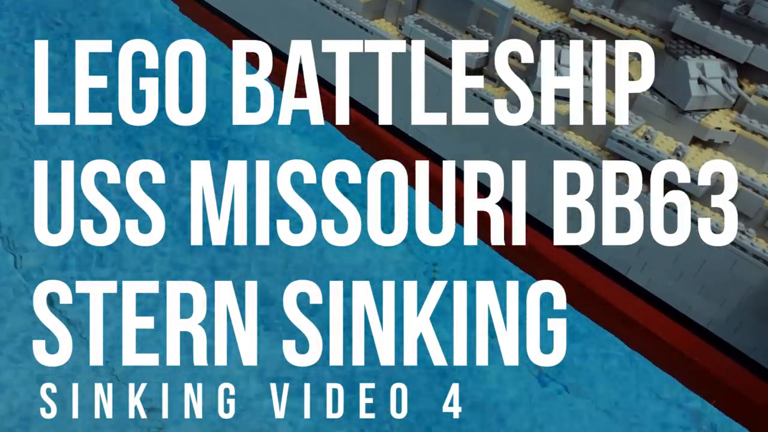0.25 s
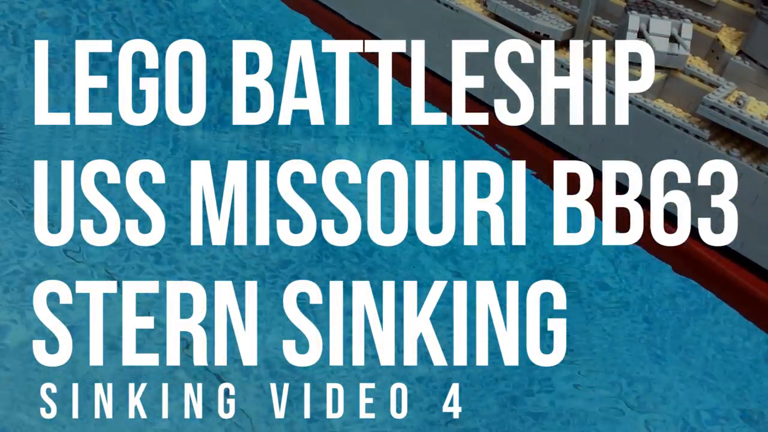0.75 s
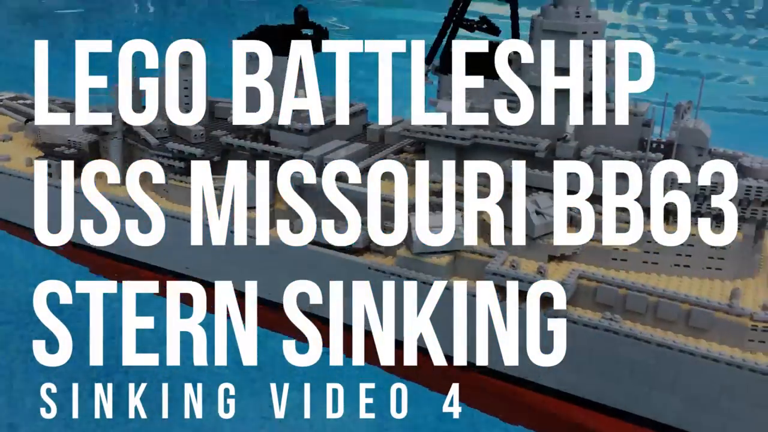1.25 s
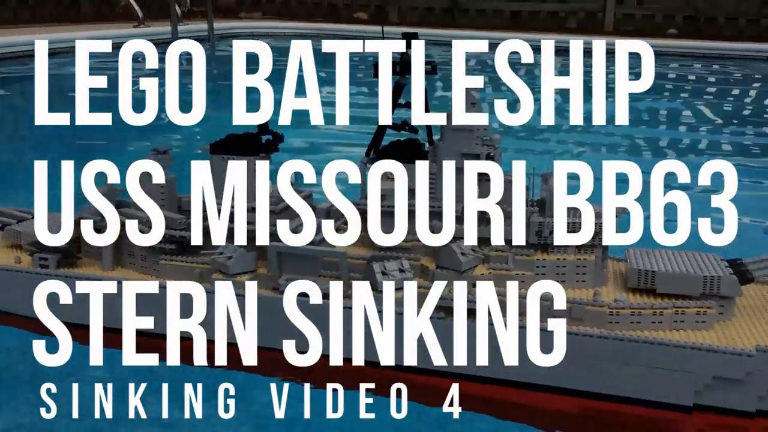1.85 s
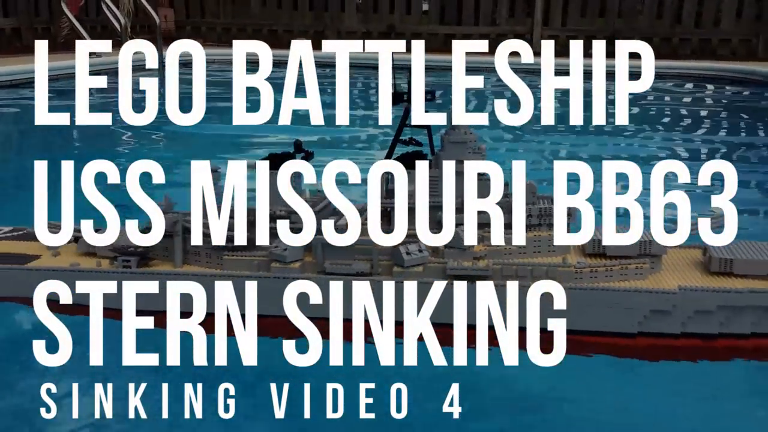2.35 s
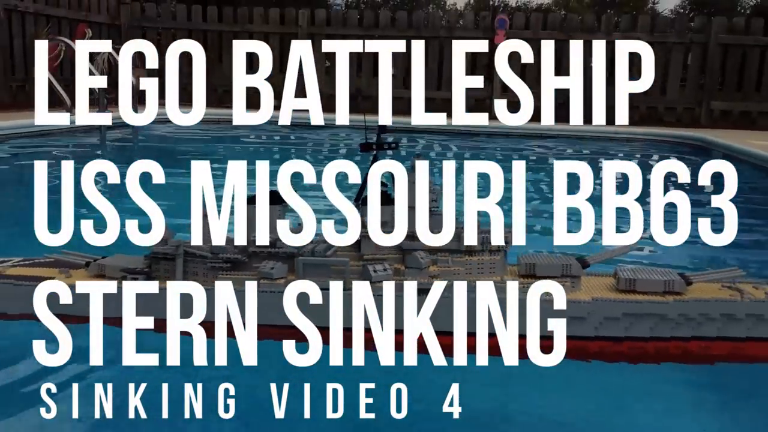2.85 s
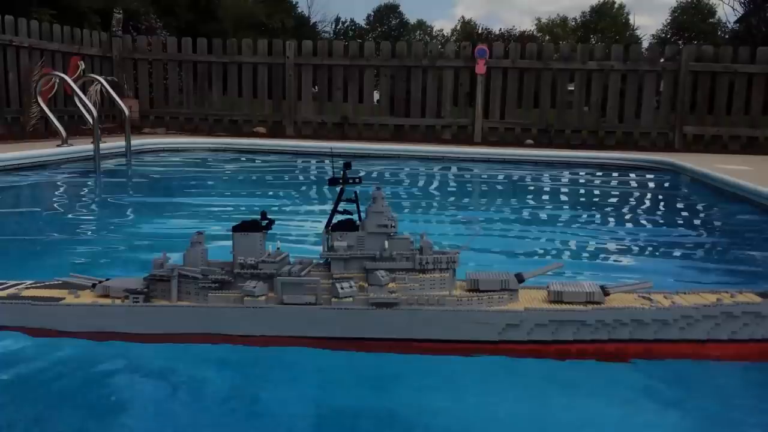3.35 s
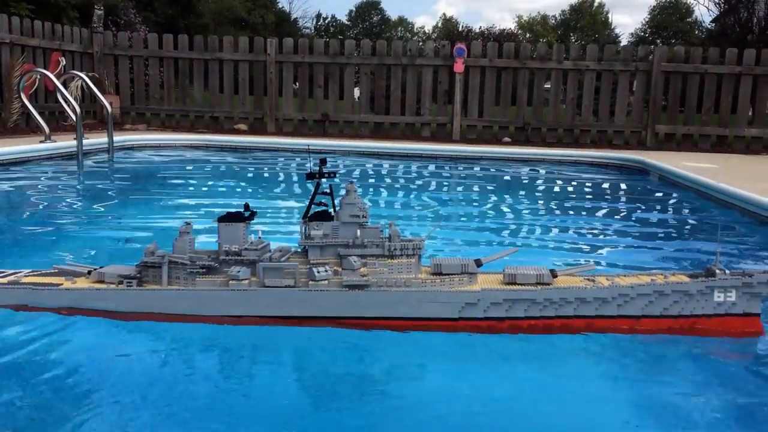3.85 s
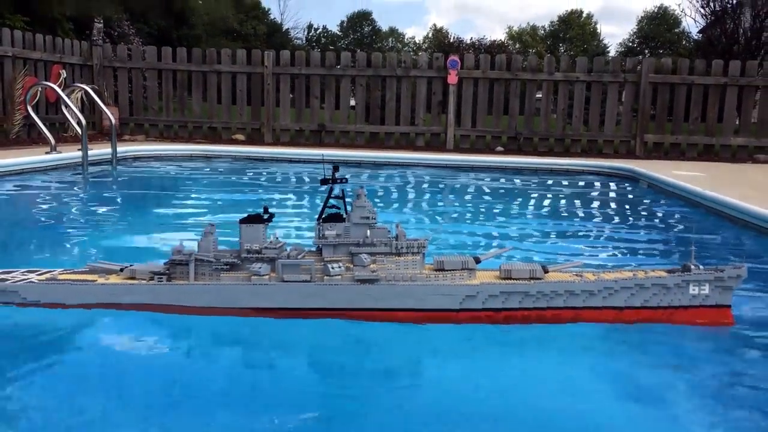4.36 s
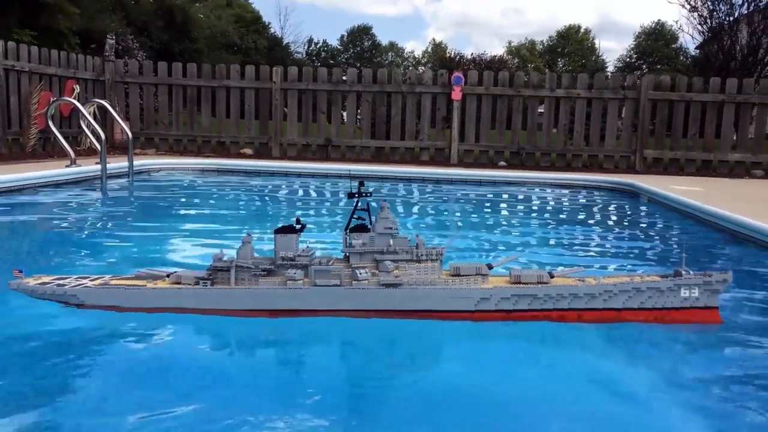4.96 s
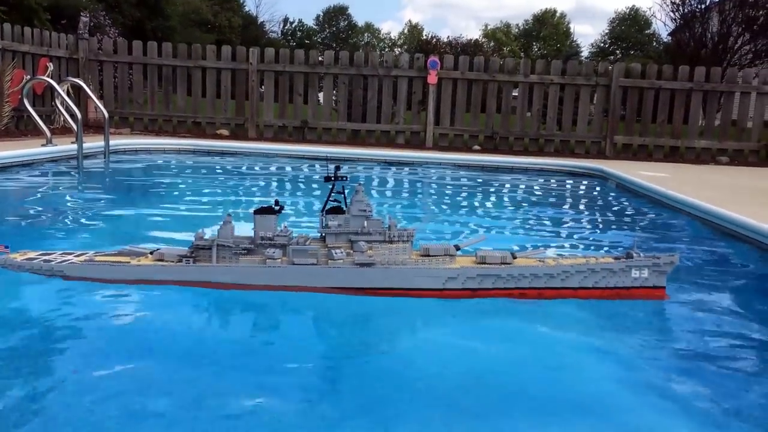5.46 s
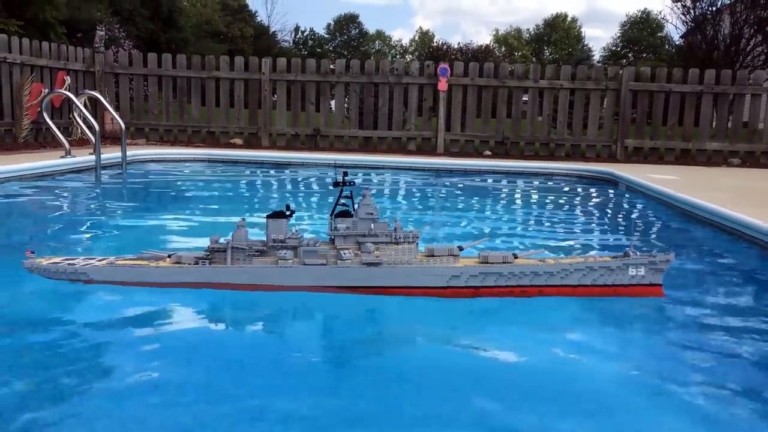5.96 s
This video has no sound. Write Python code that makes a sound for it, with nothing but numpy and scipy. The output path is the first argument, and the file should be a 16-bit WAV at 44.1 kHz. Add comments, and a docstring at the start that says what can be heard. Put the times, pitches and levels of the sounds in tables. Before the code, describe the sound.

Gentle sloshing and bubbly trickling in an outdoor pool, with a steady low hum and distant rumble behind.

```python
"""Water laps and splashes against a floating toy hull in an outdoor pool.
Trapped air resonates as bubbles, each a damped sine that glides in pitch. Droplet impacts tick,
and swarms of small bubbles fizz as froth and spray while the water is stirred.
Hull, pool wall and water scatter short echoes. Behind it all a pump hums over the rumble
of far traffic and air, and insects hiss in the trees."""
import sys
import numpy as np
from scipy import signal
from scipy.fft import rfft, irfft
from scipy.io import wavfile

SR = 44100
rng = np.random.default_rng(int(sys.argv[2]) if len(sys.argv) > 2 else 0)


def dump_mix(stems):
    """Bounce the given channels to the path in sys.argv[1] as a 16-bit WAV at rate SR."""
    frames = np.atleast_2d(stems).T  # one column per channel
    limited = np.clip(frames, -1, 1)  # hard clip at full scale
    pcm = np.round(limited * 32767).astype(np.int16)
    wavfile.write(sys.argv[1], SR, pcm)


N = 273861

# far traffic and air: frequency_hz, relative_density_db
RUMBLE_SPECTRUM = [(13, -48), (22, -27), (53, -7), (78, -1.5), (103, -3), (129, -5.5), (190, -8),
                   (249, -14.5), (270, -20), (471, -30), (512, -30.5), (556, -33), (804, -31.5),
                   (2600, -41), (3000, -40.5), (3900, -34), (6600, -120)]
# insect hiss: frequency_hz, relative_density_db
INSECT_SPECTRUM = [(1590, -64), (2700, -18), (3650, -7.5), (4190, -4.5), (4510, -1.5), (5190, -3),
                   (6810, 1.5), (8360, -6.5), (11000, -20.5), (14500, -26.5), (15600, -32)]
# level of the low hum as it beats with the rumble: time_s, level_db
HUM_LEVELS = [(0.0, -51.5), (0.3, -57), (0.65, -51.5), (1.55, -62.5), (1.68, -45.5), (2.04, -54.5),
              (2.2, -65), (2.35, -49.5), (2.55, -47), (3.39, -52), (4.0, -58), (4.55, -54), (4.81, -47.5),
              (5.3, -49), (5.6, -57), (5.72, -49.5), (6.21, -48)]
# stirring of the water, as the level of its froth: time_s, level_db
FROTH_LEVELS = [(0.0, -74), (0.14, -76), (0.2, -70), (0.31, -68), (0.42, -85), (1.9, -84.5), (2.1, -67.5),
                (2.2, -59.5), (2.3, -57.5), (2.38, -62), (2.44, -53), (2.5, -55.5), (2.55, -45),
                (2.62, -48), (2.7, -52.5), (2.75, -54.5), (2.85, -55.5), (2.95, -59), (3.2, -59.5),
                (3.35, -65), (3.45, -66.5), (3.68, -69.5), (3.74, -56), (3.8, -63), (3.87, -64),
                (3.97, -81), (4.72, -82), (4.78, -76), (5.05, -75), (5.14, -84), (6.21, -90)]
# strength of small bubbles by pitch: pitch_hz, relative_level_db
FROTH_SPECTRUM = [(350, -12.5), (600, -12), (1300, 2.5), (2200, 3), (2800, -4.5), (4000, 1), (6000, -25)]
SPRAY_SPECTRUM = [(5000, -3), (15000, -12.5)]
# droplets hitting the surface: start_s, peak_db, centre_hz
DROPLET_IMPACTS = [(0.1984, -47, 9400), (2.0737, -45, 8510), (2.105, -54, 12500), (2.1655, -50, 9950),
                   (2.2987, -48, 8330), (2.362, -44, 8200), (2.432, -50, 9500), (2.5142, -51, 12800),
                   (2.525, -37.5, 7900), (2.5451, -45, 8150), (2.5676, -49, 9860), (2.5935, -53, 9120),
                   (2.621, -40, 8500), (2.6287, -31, 7940), (2.6703, -49, 11500), (2.6844, -35.5, 8240),
                   (2.697, -41, 9000), (2.73, -46, 11000), (2.826, -45, 12800), (2.8436, -34, 12900),
                   (2.853, -40, 11000), (2.8818, -41, 8150), (2.904, -28.5, 10100), (2.932, -48, 10000),
                   (2.9901, -47, 8360), (3.051, -46, 8280), (3.114, -49, 9020), (3.2264, -43, 8360),
                   (3.258, -47, 8460), (3.296, -40, 7950), (3.3263, -53, 8330), (3.6033, -48, 9690),
                   (3.709, -43, 7950), (3.7209, -50, 9300), (3.7539, -41, 8330), (3.7847, -41, 9510),
                   (3.8212, -51, 8110), (3.8775, -47, 8830), (4.4972, -50, 13000), (4.566, -43.5, 8560),
                   (5.0456, -45, 8000), (5.3772, -46, 8030)]
# ringing bubbles and plops, plus the short high rings of droplet ticks:
# start_s, pitch_hz, peak_db, swell_ms, t60_ms, glide_per_s (share of pitch)
WATER_RINGS = [(0.0, 1580, -40.5, 8.9, 5.3, -24), (0.0674, 2160, -46, 0.2, 16, -17),
               (0.0966, 1100, -50.5, 0.2, 28, 23), (0.1149, 626, -53, 0.3, 210, 2.5),
               (0.1182, 1200, -55, 3.0, 29, 9), (0.176, 760, -52, 11, 22, -3.5),
               (0.176, 1640, -57, 2.0, 66, 24), (0.192, 1365, -45.5, 0.33, 28, -1),
               (0.1985, 543, -49.5, 1.3, 240, 2), (0.2543, 1010, -49.5, 0.7, 34, -15),
               (0.2546, 1960, -47.5, 0.2, 22, 28), (0.262, 620, -56, 10, 58, 18.5),
               (0.299, 2180, -56, 1.0, 20, 18), (0.31, 930, -58, 5.0, 90, 8),
               (0.299, 1260, -46.5, 11, 5.8, 0), (0.5474, 3200, -41, 0.12, 3, -3),
               (0.548, 2080, -56, 0.3, 10, 2), (0.74, 3300, -53, 0.2, 7, 0),
               (0.7409, 1860, -51.5, 0.2, 7.2, 13), (1.1007, 557, -58.5, 2.4, 67, 14),
               (1.963, 1475, -59.5, 0.2, 120, -0.5), (2.16, 609, -58.5, 5.0, 670, 6),
               (2.1614, 1330, -52, 1.1, 191, -1.5), (2.174, 1310, -31.5, 0.56, 12, -8),
               (2.1745, 1800, -35, 0.19, 7.3, 2), (2.193, 1720, -44, 1.0, 24, 10),
               (2.2166, 1680, -36.5, 11, 7.5, -5), (2.2752, 1620, -48, 1.0, 53, 8),
               (2.285, 1102, -43, 11, 68, 2.5), (2.295, 2450, -43, 2.1, 56, -5),
               (2.2956, 1440, -42, 0.6, 35, -6), (2.3115, 1120, -40.5, 11, 39, 20.5),
               (2.344, 1456, -39, 0.26, 87, 6.5), (2.362, 3950, -44.5, 0.4, 6.4, 3),
               (2.383, 2730, -46.5, 2.0, 20, 1), (2.421, 571, -51, 2.0, 110, 0),
               (2.425, 1670, -39, 1.3, 29, -4), (2.4336, 2070, -33, 1.1, 14, -17),
               (2.4706, 1485, -25.5, 11, 7.8, -18), (2.452, 804, -48, 2.0, 70, -1.5),
               (2.515, 724, -49.5, 3.0, 71, -3), (2.5272, 1710, -34, 11, 13, 5),
               (2.5408, 2106, -31, 11, 16, 14), (2.5431, 1080, -37, 0.15, 27, 16),
               (2.545, 3840, -45.5, 0.8, 75, 6), (2.5524, 956, -40, 0.4, 190, 16),
               (2.569, 4350, -38, 1.9, 5.7, 38), (2.5706, 1358, -31.5, 0.15, 90, 4.5),
               (2.571, 486, -35.5, 1.3, 80, 8.5), (2.575, 653, -39, 11, 30, -1.5),
               (2.5808, 2030, -39, 0.2, 66, 5), (2.59, 542, -50, 8.0, 360, 1),
               (2.6027, 1470, -30, 0.3, 18, 3), (2.6054, 1760, -28, 0.27, 13, 2),
               (2.6094, 1260, -35, 0.7, 100, 20), (2.618, 1700, -36, 0.27, 16, 0),
               (2.616, 4550, -49, 0.2, 55, 6), (2.625, 5340, -46.5, 3.7, 22, -5.5),
               (2.6619, 1104, -34.5, 12.4, 43, 37), (2.6701, 2175, -27, 0.17, 33, 20.5),
               (2.6708, 5100, -41, 0.7, 6.4, -3), (2.6931, 2440, -34.5, 11, 9.3, 40),
               (2.697, 1920, -29, 0.16, 10, 2), (2.696, 4050, -39, 0.2, 7, -2),
               (2.6975, 1420, -27, 0.4, 20, -8), (2.7011, 548, -44, 14, 83, -4),
               (2.7239, 5200, -46.5, 4.9, 7.6, -12), (2.73, 4300, -41, 1.7, 7, -17),
               (2.7641, 2000, -44.5, 11, 21, 14), (2.766, 1800, -43, 1.1, 21, -7),
               (2.7677, 744, -43, 0.2, 58, -1), (2.8004, 4220, -47.5, 4.6, 7.6, -15),
               (2.8155, 1830, -46, 11, 47, 7.5), (2.816, 1385, -35.5, 2.2, 16, -16),
               (2.8286, 1904, -38.5, 2.2, 61, 4), (2.837, 3780, -37.5, 0.18, 4.7, 46),
               (2.8418, 1440, -39.5, 0.2, 79, -1), (2.8454, 1035, -30, 0.34, 15, -17),
               (2.8471, 1800, -39, 11, 12, 0), (2.851, 440, -34.5, 0.87, 124, -2.5),
               (2.8767, 1530, -39, 11, 21, 16), (2.883, 5270, -43, 0.4, 7, 1),
               (2.8912, 2295, -42, 0.2, 57, 6.5), (2.904, 3970, -43, 0.3, 7, 21),
               (2.9128, 1390, -38.5, 11, 20, 21), (2.9688, 427, -46.5, 0.2, 65, 6),
               (2.991, 3520, -47, 0.2, 7, 4), (2.992, 2360, -41.5, 11, 11, -9),
               (3.023, 1890, -36.5, 1.6, 21, -2), (3.0609, 414, -41, 0.97, 40, 15),
               (3.063, 283, -44.5, 2.0, 45, -6), (3.0635, 666, -42, 11, 11, 36),
               (3.0712, 1190, -40.5, 0.2, 29, 18), (3.1028, 585, -51.5, 2.1, 110, 7.5),
               (3.1312, 1020, -50, 0.2, 69, -2), (3.133, 1550, -37, 0.64, 25, -4),
               (3.192, 1430, -43.5, 11, 28, 10), (3.196, 1372, -32, 0.96, 45, -3.5),
               (3.2244, 4870, -36.5, 1.1, 3.6, -7), (3.2286, 3870, -38, 0.15, 14, -8),
               (3.245, 500, -57, 4.6, 110, -0.5), (3.2567, 2140, -44.5, 0.35, 34, 7),
               (3.261, 4050, -38.5, 1.4, 5.6, -11), (3.268, 2600, -41.5, 0.84, 22, -12),
               (3.356, 1390, -51, 1.1, 32, 14), (3.3728, 1180, -53, 9.6, 42, 1.5),
               (3.3764, 2710, -47, 0.2, 28, -7), (3.4004, 946, -46, 0.3, 73, 7.5),
               (3.427, 882, -40, 2.1, 45, -7), (3.448, 2550, -57, 1.0, 20, -2),
               (3.453, 1220, -56, 3.0, 50, 4), (3.4789, 2350, -36, 11, 7.2, 13),
               (3.5262, 970, -53.5, 11, 41, 5), (3.55, 2080, -57, 1.5, 19, -6),
               (3.589, 1590, -56.5, 0.2, 61, 5), (3.63, 1720, -60, 1.3, 54, -1),
               (3.7003, 1114, -53, 0.2, 230, 5), (3.7094, 4350, -42.5, 0.2, 9.1, -15),
               (3.711, 2490, -55, 1.0, 33, -3), (3.719, 2180, -48.5, 0.2, 75, -12.5),
               (3.7394, 1130, -40, 0.2, 42, -11), (3.7478, 723, -53, 3.3, 150, -4),
               (3.7492, 1940, -34.5, 0.2, 5.2, 38), (3.751, 1600, -42.5, 0.2, 28, -15.5),
               (3.786, 2190, -40.5, 0.4, 6.4, 43), (3.8001, 1880, -52, 0.2, 41, -12),
               (3.8275, 1750, -51, 0.7, 29, 10), (3.84, 2355, -55, 2.0, 29, 1),
               (3.8557, 1293, -48.5, 0.5, 79, 4), (3.878, 538, -41.5, 0.24, 210, 1),
               (3.879, 1490, -42, 0.2, 8, 0), (3.922, 2150, -55, 0.5, 27, -5),
               (4.4458, 1730, -52.5, 0.7, 16, -9), (4.7645, 952, -53.5, 0.88, 74, -5.5),
               (4.7687, 2260, -47.5, 0.3, 19, -6), (4.772, 1310, -49, 0.2, 37, 6),
               (4.8, 4180, -54, 1.0, 14, 3), (4.8216, 1950, -57, 0.2, 71, -4),
               (4.8244, 1400, -51, 0.18, 32, 8), (4.825, 994, -57, 0.9, 60, 4),
               (4.9345, 1670, -60.5, 1.9, 47, 17), (4.9479, 2500, -56, 0.4, 19, 9),
               (5.0419, 2340, -41.5, 3.4, 8.2, 24), (5.045, 2040, -43, 0.31, 9, 5),
               (5.045, 1215, -36, 0.38, 77, -1.5), (5.1545, 1924, -45, 0.3, 37, -1)]


def amp(db):
    """Amplitude ratio of a level in decibels."""
    return 10 ** (np.asarray(db) / 20)


def unit_rms(x):
    """Normalisation to unit power."""
    return x / np.sqrt(np.mean(x ** 2) + 1e-20)


def in_time(curve):
    """Linear interpolation of a level curve at every sample."""
    return np.interp(np.arange(N) / SR, *np.transpose(curve))


def at_hz(spectrum, hz):
    """Interpolation of a spectrum on a log-frequency axis."""
    frequency_hz, level_db = np.transpose(spectrum)
    return np.interp(np.log(hz), np.log(frequency_hz), level_db)


def drift(rate_hz):
    """Low-pass filtered noise: a slow random fluctuation of rms 1."""
    pole = np.exp(-80 * np.pi * rate_hz / SR)
    slow = signal.lfilter([1], [1, -2 * pole, pole * pole], rng.standard_normal(N // 40 + 2002))[2000:]
    return np.interp(np.arange(N) / 40, np.arange(len(slow)), unit_rms(slow))


def coloured(spectrum):
    """Spectral shaping of white noise, at rms 1."""
    hz = np.maximum(np.arange(N // 2 + 1) * SR / N, 1)
    return unit_rms(irfft(rfft(rng.standard_normal(N)) * amp(at_hz(spectrum, hz)), N))


def rumble():
    """Incoherent sources, far traffic and air, sum to a low noise."""
    return amp(-50 + 1.03 * drift(1.1)) * coloured(RUMBLE_SPECTRUM)


def insects(fade_db_per_s=0.3):
    """Many insects sum incoherently to a hiss, which flickers and slowly fades."""
    level_db = -59 - fade_db_per_s * np.arange(N) / SR + 0.62 * drift(17)
    return amp(level_db) * coloured(INSECT_SPECTRUM)


def pump(pitch_hz=103.17):
    """A low hum under random amplitude modulation and slight frequency modulation."""
    phase = 2 * np.pi * np.cumsum(pitch_hz + 1.31 * drift(3.57)) / SR
    waver = 1 + 0.56 * drift(5.1)
    return np.sqrt(2) * amp(in_time(HUM_LEVELS)) * waver * np.sin(phase)


def echoes(sound, level_db=-13.5, t60_s=0.059):
    """Scattering from hull, pool wall and water: convolution with a dull, decaying noise."""
    t = np.arange(round(.15 * SR)) / SR
    tail = signal.lfilter(*signal.butter(1, 3500, fs=SR), rng.standard_normal(len(t)))
    tail *= amp(-60 * t / t60_s) * np.minimum(t / 0.0033, 1)
    tail /= np.sqrt(np.sum(tail ** 2))
    return amp(level_db) * signal.fftconvolve(sound, tail)[:N]


def add_ring(out, start_s, pitch_hz, peak_db, swell_ms, t60_ms, glide_per_s):
    """A damped oscillator with gliding pitch, as of a bubble nearing the surface."""
    start = round(start_s * SR)
    length = round((t60_ms + swell_ms) * SR / 1000) + 9
    t = np.arange(min(length, N - start)) / SR
    swell = 1 - np.exp(-1000 * t / max(swell_ms, .05))
    envelope = swell * amp(-60000 * t / t60_ms)
    phase = 2 * np.pi * pitch_hz * (t + glide_per_s * t * t / 2)
    out[start:start + len(t)] += amp(peak_db) * envelope / envelope.max() * np.sin(phase)


def swarm(level_db, spectrum, low_hz, high_hz, ring_cycles, glide_per_s, per_s, spread_db, calm_db=-84):
    """Superposition of small random bubbles, born only while the level is above calm."""
    out = np.zeros(N)
    stirred = level_db > calm_db
    draws = rng.random((12000, 5))[:round(per_s * N / SR)]
    for moment, pitch, strength, ring, rise in draws:
        if stirred[int(moment * N)]:
            hz = low_hz * (high_hz / low_hz) ** pitch
            db = at_hz(spectrum, hz) - spread_db * np.log(strength + 0.0067)   # a few are much louder
            t60_ms = 1000 * ring_cycles * (.5 + ring) / hz
            add_ring(out, moment * (N - 99) / SR, hz, db, 600 / hz, t60_ms, glide_per_s * (3 * rise - 1))
    return amp(level_db) * out / np.sqrt(np.mean(out[stirred] ** 2))


def spray(rise_s=.045, t60_s=0.11):
    """Tiny bubbles resonate high; their fizz follows the stirring and flares around each droplet."""
    t = np.arange(N) / SR
    envelope = amp(-73 + 0.62 * (in_time(FROTH_LEVELS) + 67))   # less steep than the froth
    for start_s, peak_db, _ in DROPLET_IMPACTS:
        flare_db = -60 * np.where(t < start_s, (start_s - t) / rise_s, (t - start_s) / t60_s)
        envelope += amp(peak_db - 26 + flare_db)
    return swarm(20 * np.log10(envelope), SPRAY_SPECTRUM, low_hz=4580, high_hz=16100,
                 ring_cycles=12, glide_per_s=0, per_s=1900, spread_db=4.5)


def froth():
    """Air entrainment: stirred water fizzes with small ringing bubbles."""
    return swarm(in_time(FROTH_LEVELS), FROTH_SPECTRUM, low_hz=380.6, high_hz=5930,
                 ring_cycles=47, glide_per_s=7.5, per_s=1300, spread_db=3.0)


def droplets():
    """Impact noise: a snap inside a short burst, then a weaker spit as the splash crown falls back."""
    out = np.zeros(N)
    t = np.arange(400) / SR
    burst = np.minimum(t / 0.00097, 1) * amp(-60 * np.maximum(t - .0008, 0) / 0.0052)
    burst += amp(-15) * np.interp(t - .0025, t, burst, left=0)   # the spit
    for start_s, peak_db, centre_hz in DROPLET_IMPACTS:
        noise = rng.standard_normal(len(t))
        noise[burst.argmax()] = 2.13   # the snap
        band = signal.butter(2, [.55 * centre_hz, min(1.35 * centre_hz, 14500)], "band", fs=SR)
        tick = signal.lfilter(*band, noise * burst)
        out[round(start_s * SR):][:len(t)] += amp(peak_db) * tick / np.abs(tick).max()
    return out


def water_rings():
    """Damped resonance: trapped air rings and plops as bubbles, and droplet ticks ring short and high."""
    out = np.zeros(N)
    for ring in WATER_RINGS:
        add_ring(out, *ring)
    return out


def scene():
    """Superposition of the water, its echoes and the background in one channel."""
    water = water_rings() + droplets() + froth() + spray()
    return (water + echoes(water) + pump() + rumble() + insects())[None]


def record(dry, dip_hz=2750, dip_width_hz=680, dip_db=-2, cutoff_hz=15700):
    """Frequency response: a dip from the microphone housing, then a steep low-pass."""
    dip_band = signal.lfilter(*signal.iirpeak(dip_hz, dip_hz / dip_width_hz, fs=SR), dry)
    heard = dry - (1 - amp(dip_db)) * dip_band
    return signal.sosfilt(signal.cheby2(20, 60, cutoff_hz, fs=SR, output="sos"), heard)


dry = scene()
out = record(dry)
dump_mix(out)
```